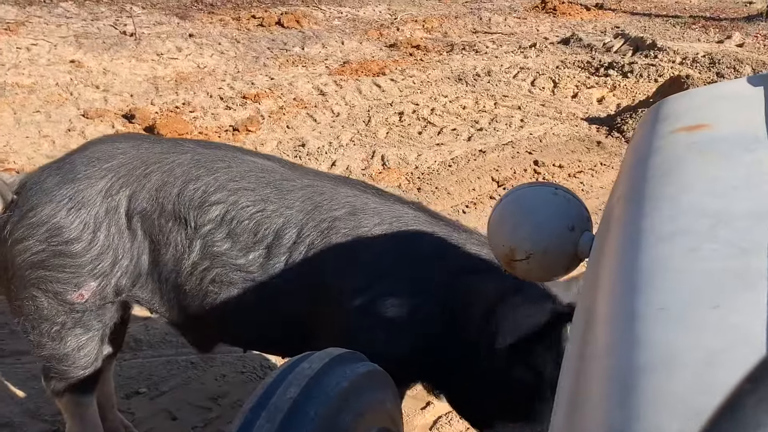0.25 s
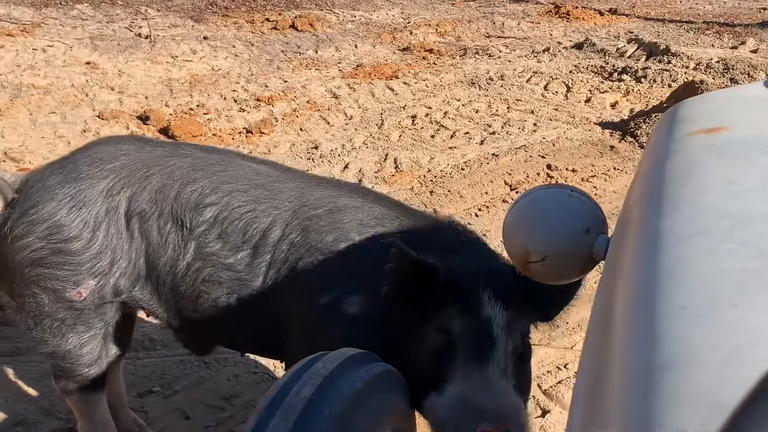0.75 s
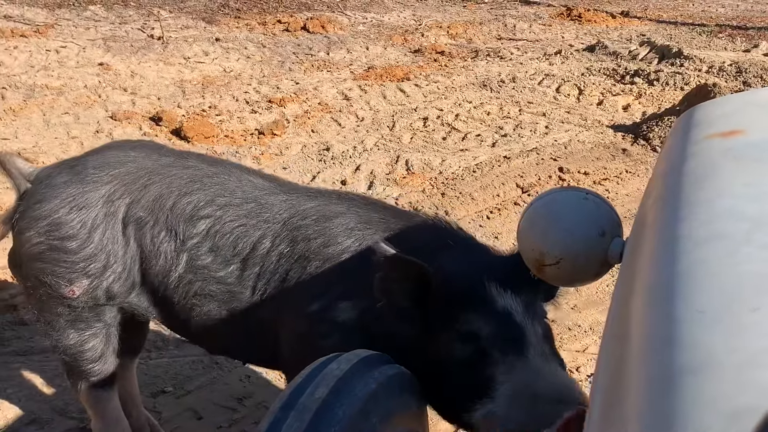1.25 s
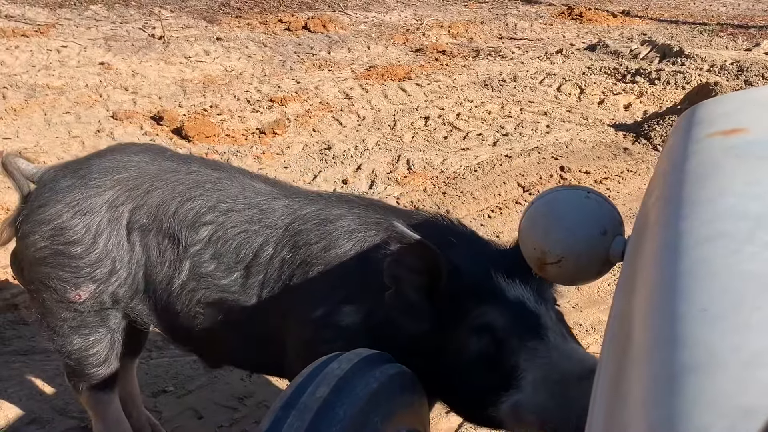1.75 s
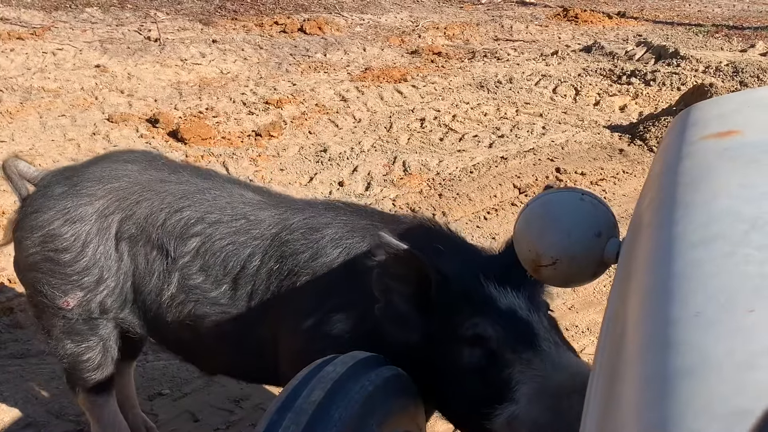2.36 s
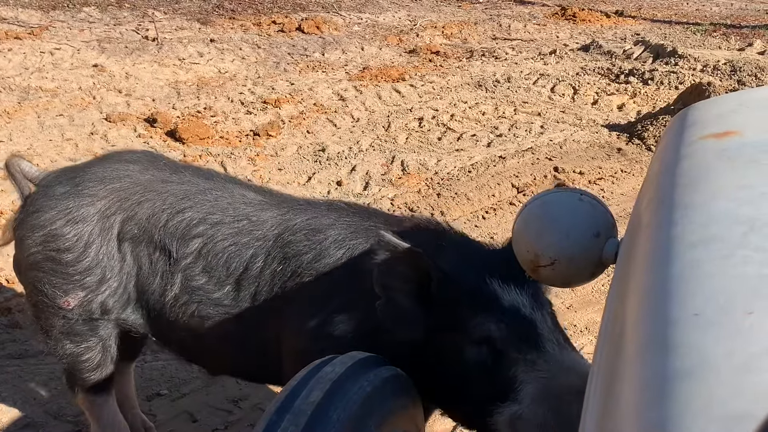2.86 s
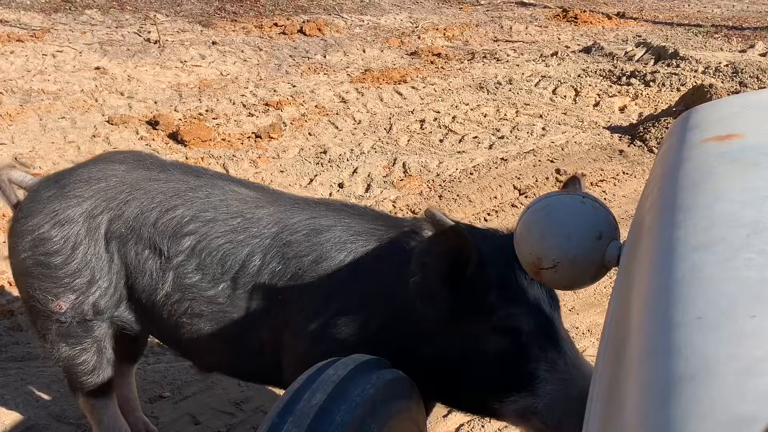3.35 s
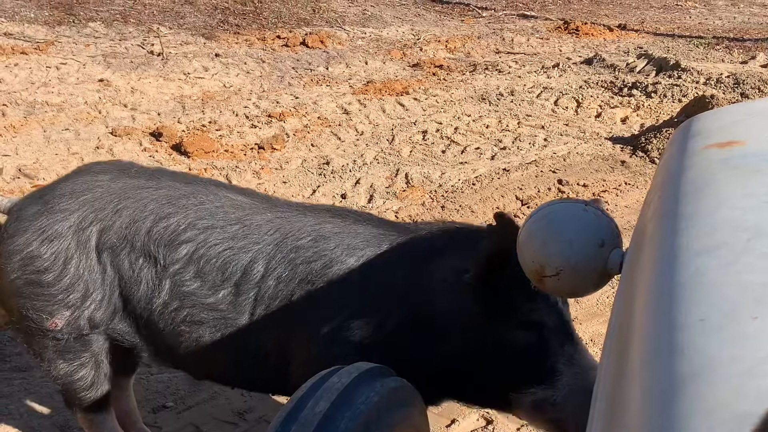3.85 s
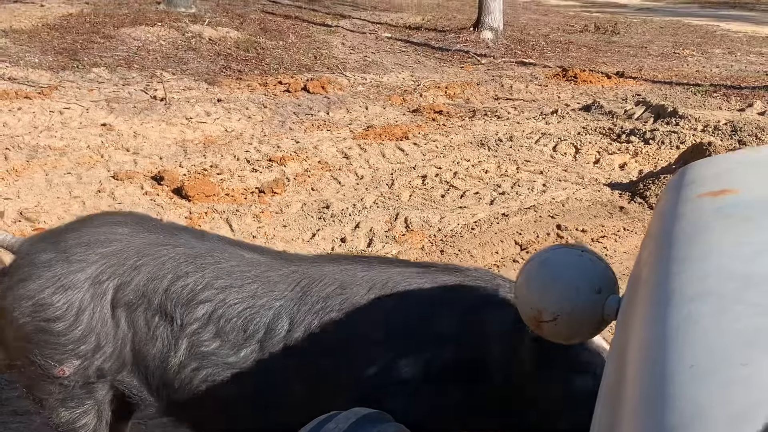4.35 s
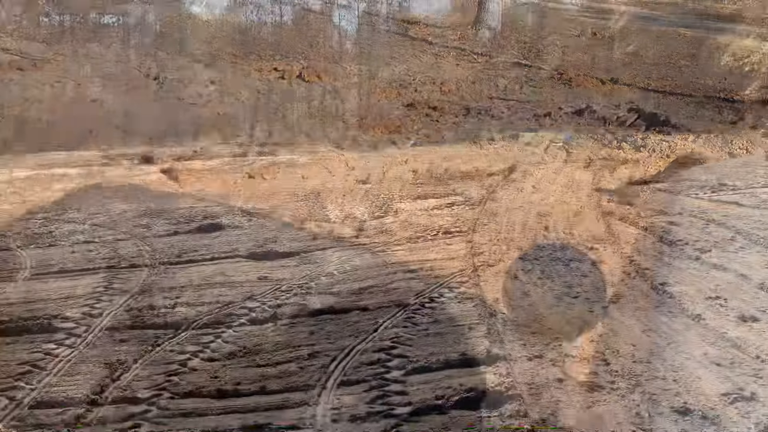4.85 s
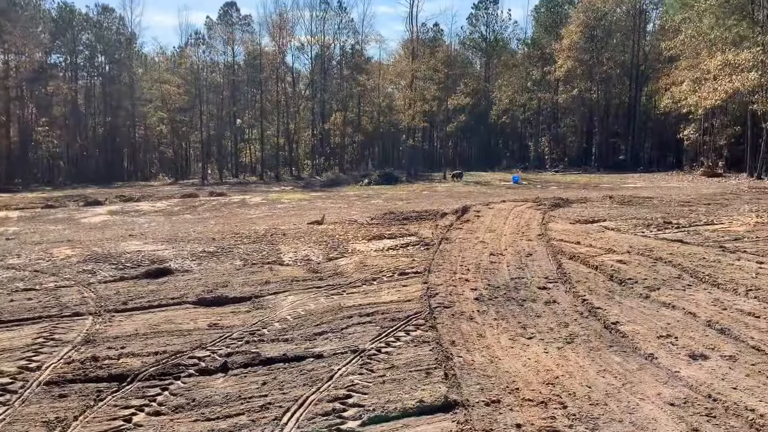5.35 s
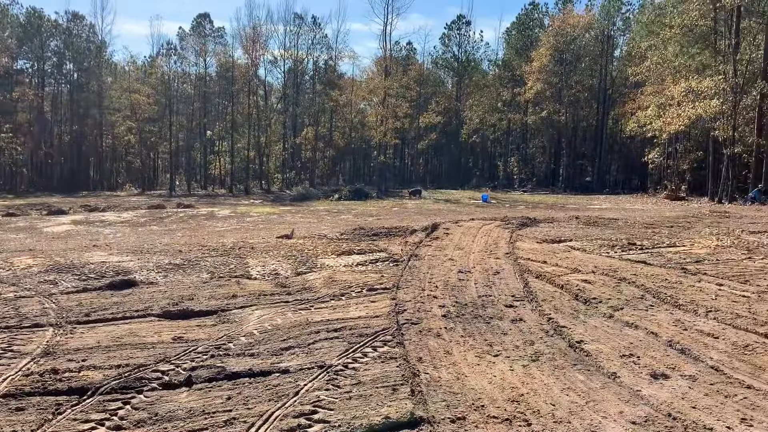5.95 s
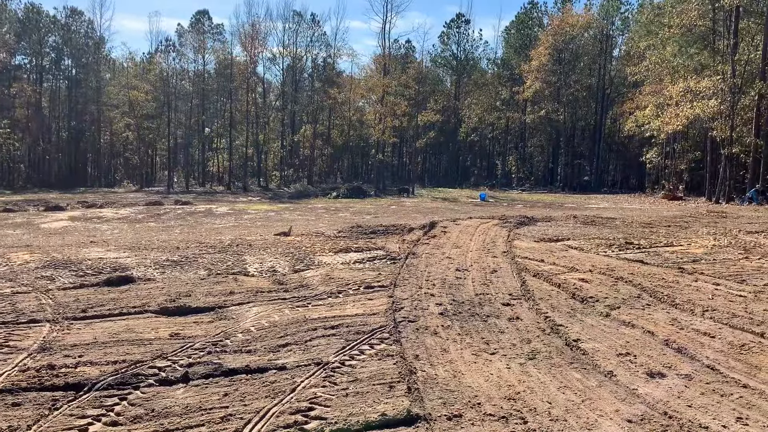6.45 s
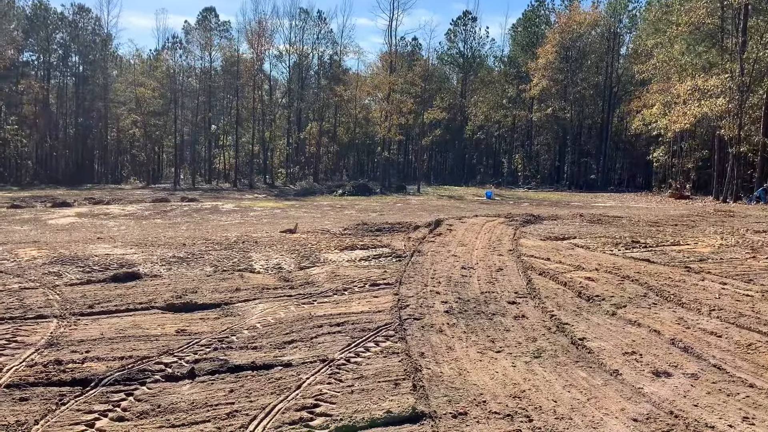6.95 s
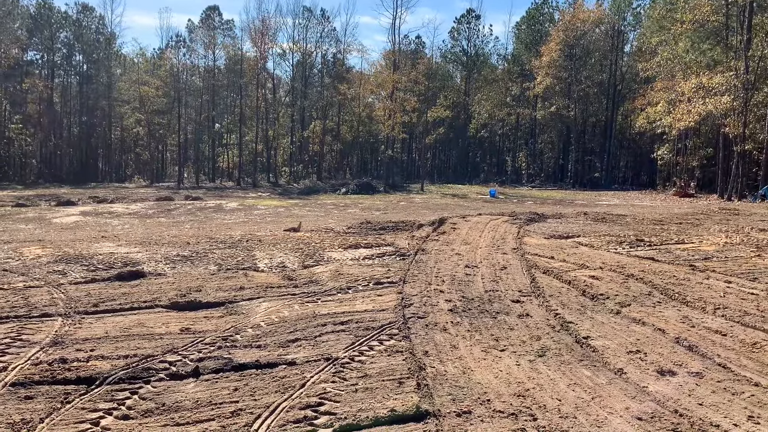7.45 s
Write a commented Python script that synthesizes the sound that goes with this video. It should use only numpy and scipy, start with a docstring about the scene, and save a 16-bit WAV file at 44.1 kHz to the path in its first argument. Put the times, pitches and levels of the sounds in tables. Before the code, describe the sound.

Breathy pig sniffs and a sharp rasping snort outdoors, soft hollow metal knocks, then muffled taps, low engine hum and a faint cricket.

```python
"""In a yard a pig snuffles at a steel tank beside a hand-held camera, then the scene fades over to an open field.
The pig is filtered noise for breathy sniffs and bursts of dying sines for one fluttering snort; struck modes ring
as knocks on the tank. Dull taps (resonant noise) gather around the fade and go on in the field, which adds a far
engine hum (narrow noise) and a cricket (a pulsed sine). Coloured noise makes both backgrounds, a low rumble and a
passing roar; thumps on the microphone are sagging sines, and small bright ticks are resonant snaps of noise.
"""
import sys
import numpy as np
from scipy import signal
from scipy.io import wavfile
from scipy.ndimage import uniform_filter1d

SR = 44100
rng = np.random.default_rng(int(sys.argv[2]) if len(sys.argv) > 2 else 0)


def transcribe(u):
    """Save the signal u as a 16-bit wav file named by the first command-line argument.

    u: samples, shape (n,) or (channels, n), limited to [-1, 1]; the rate is SR.
    q: integer samples, one column per channel.
    """
    v = np.clip(np.atleast_2d(u).T, -1, 1)
    q = np.round(v * 32767).astype(np.int16)
    wavfile.write(sys.argv[1], SR, q)


N = 339119
T = np.arange(N) / SR  # time in seconds

# Low thumps on the microphone. Each row: start in seconds, level in dB, first and last pitch in Hz,
# t60 in seconds, level of the snap in dB, swell of the rumble in dB.
THUMP_HITS = [(1.185, -21.5, 110, 55.9, 0.068, -68, 19), (4.149, -28.5, 194, 51, 0.17, -26.5, 1.5),
              (4.512, -35.5, 73, 50, 0.11, -56, 10)]


def amp(db):
    """Turns decibels into a linear gain."""
    return 10 ** (np.asarray(db) / 20)


def evened(x):
    """Scales a signal to an rms of 1."""
    return x / np.sqrt(np.mean(x ** 2) + 1e-20)


def read(points, hz):
    """Reads a spectral curve at the given frequencies, straight between points on a log scale."""
    f, value = np.transpose(points)
    return np.interp(np.log(hz + 1), np.log(f + 1), value)


def curve(rows, t=T):
    """Reads an automation curve of (seconds, value) rows, straight between points."""
    s, value = np.transpose(rows)
    return np.interp(t, s, value)


def add(mix, s, sound):
    """Lays a sound into the mix at s seconds, cut off at the end of the mix."""
    part = mix[..., round(s * SR):][..., :sound.shape[-1]]
    part += sound[..., :part.shape[-1]]


def resonate(x, hz, width):
    """A resonance of gain 1: shifts hz down to zero, smooths, and shifts back."""
    turn = np.exp(2j * np.pi * hz * np.arange(x.shape[-1]) / SR)
    r = np.exp(-np.pi * width / SR)
    return 2 * (turn * signal.lfilter([1 - r], [1, -r], x / turn)).real


def noise(colour, patchy_db, size, likeness, banded_db=0):
    """Two-channel noise of rms 1 from random short-time spectra, with drifting patches and slow narrow bands."""
    frames, hz = 4 * N // size + 5, np.fft.rfftfreq(size, 1 / SR)
    a, b, c, d, patches, bands = rng.standard_normal((frames, len(hz), 6), dtype=np.float32).T
    # smoothed over frequency first, then over time
    bands = uniform_filter1d(bands, size=2, axis=0)
    bands = evened(uniform_filter1d(bands, size=40, axis=1))
    patches = uniform_filter1d(patches, size=size // 100, axis=0)
    patches = evened(uniform_filter1d(patches, size=8, axis=1))
    same = np.clip(read(likeness, hz), -1, 1)[:, None]
    left = a + 1j * b
    right = same * left + np.sqrt(1 - same ** 2) * (c + 1j * d)
    level_db = read(colour, hz)[:, None] + patchy_db * patches + banded_db * bands
    spectra = np.array([left, right]) * amp(level_db)
    return evened(signal.istft(spectra, nperseg=size, noverlap=3 * size // 4)[1][:, :N])


def ring(modes, factor=1, tilt_db=0, rise=.001, size=SR):
    """Dying sines of random phase, a little apart in the two ears; tilt_db per octave about 300 Hz."""
    t, out = np.arange(size) / SR, 0
    for hz, db, t60 in modes:
        phase = np.cumsum(rng.random(2) * [1, .12])[:, None]  # in cycles
        decay = amp(db + tilt_db * np.log2(hz / 300) - 60 * t / t60)
        out = out + decay * np.sin(2 * np.pi * (hz * factor * t + phase))
    return out * (1 - np.exp(-t / rise)) / abs(out).max()


def air_outdoors():
    """Noise beds: the yard fades into the field with its hum, over rumble that swells at each thump and a roar."""
    # Noise colours. Each row: frequency in Hz, relative level in dB per Hz.
    yard_colour = [(28, -42.5), (45, -11), (70, -8.5), (110, -6.5), (200, -11), (300, -18.5), (500, -23.5),
                   (900, -27), (1400, -39.5), (2500, -44.5), (7000, -50), (14300, -48), (15000, -73.5),
                   (16000, -81.5)]
    field_colour = [(28, -41.5), (45, -29.5), (87, -0.5), (127, -21.5), (240, -17.5), (310, -28),
                    (530, -20.5), (700, -35.5), (950, -24), (1130, -41), (1350, -37), (2200, -51.5),
                    (7000, -53.5), (13700, -56), (14300, -100), (16000, -99)]
    rumble_colour = [(25, -42), (42, 0), (60, 15), (100, 6), (180, 0), (300, -47.5), (1500, -49),
                     (6000, -85.5)]
    roar_colour = [(150, -23.5), (240, -0.5), (700, -6), (1000, -12.0), (1600, -38.5), (16000, -91.5)]
    # Open air in stereo. Each row: frequency in Hz, left-right likeness from 0 to 1.
    diffuse = [(60, .92), (270, .85), (450, .5), (740, .1), (2000, .1), (15000, 0)]
    # Level rides, the roar's for a dull passing sound. Each row: time in seconds, level in dB.
    rumble_ride = [(0, -56), (2., -56.5), (4., -53), (4.7, -59.5), (5.3, -56), (7.69, -57.5)]
    roar_ride = [(4.9, -76.5), (5.4, -71.5), (5.8, -64.5), (6.3, -74), (7.69, -84)]
    # Partials of the far engine. Each row: frequency in Hz, width in Hz, level at first in dB, at the end in dB.
    hum_partials = [(86.18, 0.89, -57.5, -54.5), (169, 1.3, -64, -76.5)]
    yard_db, field_db, fade_s = -61, -58.5, (4.49, 5.09)
    swell_rise_s, swell_fall_s = 0.068, 0.16

    fade = np.interp(T, fade_s, (0, 1))
    hum = np.zeros(N)
    for hz, width, *ends_db in hum_partials:
        partial = evened(resonate(rng.standard_normal(N), hz, width))
        hum += amp(np.interp(T, (6.2, T[-1]), ends_db)) * partial
    yard = amp(yard_db) * noise(yard_colour, patchy_db=-1.5, size=2048, likeness=diffuse)
    field = amp(field_db) * noise(field_colour, patchy_db=2.0, size=2048, likeness=diffuse) + hum
    swell_db = np.zeros(N)
    for s, *_, db in THUMP_HITS:
        swell_db += np.interp(T - s, (-swell_rise_s, 0, swell_fall_s), (0, db, 0))
    rumble = noise(rumble_colour, patchy_db=1.5, size=2048, likeness=diffuse)
    rumble *= amp(curve(rumble_ride) + swell_db)
    roar = amp(curve(roar_ride)) * noise(roar_colour, patchy_db=0.0, size=2048, likeness=diffuse)
    return (1 - fade) * yard + fade * field + rumble + roar


def cricket():
    """Wing strokes 30 times a second pulse a sine, uneven in strength, a few skipped, off to the left."""
    start_s, end_s, strokes_per_s = 5.238, 6.41, 29.8
    strokes = np.clip(T - start_s, 0, end_s - start_s) * strokes_per_s
    skip, strength = rng.random((N, 2))[strokes.astype(int)].T
    pulses = np.sin(np.pi * strokes) ** 2 * (T < end_s)
    pulses *= (skip > .1) * amp(-5. * strength)  # about one stroke in ten is left out
    left_right = amp([[5.], [-7.]])
    return amp(-87.5) * pulses * np.sin(2 * np.pi * 5012 * T) * left_right


def ticks():
    """Tiny snaps: quickly dying noise through a resonance that is relatively broader the higher it lies."""
    # Each row: start in seconds, peak level in dB, centre in Hz.
    snaps = [(0.774, -59, 2390), (.868, -68, 11000), (.992, -63, 11000), (1.05, -61, 11000),
             (1.065, -63, 7000), (1.083, -67, 7000), (1.671, -61.5, 2200), (1.922, -68, 3920),
             (2.31, -67, 3920), (3.216, -55, 2420), (3.517, -52.5, 10900), (4.146, -60, 2480),
             (4.464, -48, 2340), (4.502, -47.5, 4150), (5.186, -62, 8300), (5.671, -62, 6230),
             (5.704, -62, 2400), (5.738, -68, 2380), (6.179, -52, 5400), (6.42, -70.5, 5000),
             (6.51, -69, 9000), (6.79, -65, 11000), (7.65, -66.5, 4100)]
    out, t = np.zeros((2, N)), np.arange(SR // 40) / SR
    for s, db, hz in snaps:
        burst = rng.standard_normal((2, len(t))) * amp(-60 * t / 0.028) * (1 - np.exp(-t / 0.00021))
        width = 0.17 * hz * np.sqrt(hz / 1000)
        snap = resonate(resonate(burst, hz, width), hz, width)
        add(out, s, amp(db) * snap / abs(snap).max())
    return out


def thumps():
    """A blast of air or a jolt on the microphone: a short snap, then one sine that sags in pitch."""
    out, t = np.zeros(N), np.arange(SR // 4) / SR
    for s, db, start_hz, end_hz, t60, snap_db, _ in THUMP_HITS:
        hz = end_hz + (start_hz - end_hz) * np.exp(-t / 0.0057)
        add(out, s, amp(db - 60 * t / t60) * np.sin(2 * np.pi * np.cumsum(hz) / SR))
        from_peak = t - .003
        snap = np.exp(-(from_peak / 0.00075) ** 2) * np.cos(2 * np.pi * 850.0 * from_peak)
        add(out, s - .004, amp(snap_db) * snap)
    return np.array([out, np.roll(out, shift=8)])  # the left port hears it first


def taps():
    """Short noisy blows coloured by one broad resonance, with little treble."""
    # Each row: start in seconds, peak level in dB before panning and treble mixing, centre in Hz, t60 in seconds.
    blows = [(0.277, -69, 468, 0.053), (4.154, -43, 570, 0.025), (4.191, -47.5, 960, 0.022),
             (4.505, -60, 482, 0.07), (4.675, -43.5, 850, 0.36), (4.871, -47.5, 558, 0.12),
             (4.949, -53.5, 645, 0.099), (5.098, -39.5, 536, 0.082), (5.122, -49, 930, 0.045),
             (5.201, -52, 680, 0.022), (5.271, -53, 526, 0.046), (5.387, -35, 510, 0.044),
             (5.413, -51.5, 870, 0.033), (5.51, -42.5, 524, 0.03), (5.67, -40.5, 676, 0.061),
             (5.685, -49.5, 557, 0.018), (6.087, -44, 816, 0.031)]
    out, t = np.zeros((2, N)), np.arange(SR // 8) / SR
    dull = signal.butter(4, (330., 1300.), "band", fs=SR, output="sos")
    left_right = amp([[.6], [-.6]])
    for s, db, hz, t60 in blows:
        near, apart = rng.standard_normal((2, len(t)))
        blow = np.array([near, near + 0.94 * apart])  # the right has extra noise of its own
        blow = blow * amp(-60 * t / max(t60, .005)) * (1 - np.exp(-t / 0.00085))
        body = signal.sosfilt(dull, blow + 13.4 * resonate(blow, hz, 230.0)) + amp(-32.0) * blow
        add(out, s, amp(db) * left_right * body / abs(body).max())
    return out


def tank():
    """A hollow steel shell knocked by the snout: its modes come in close pairs, so they beat as they die."""
    # Each row: start in seconds, level in dB, brightness in dB per octave, factor on the mode frequencies.
    knocks = [(2.344, -34.5, 4.5, 1.16), (2.387, -34.5, 2, .99), (3.01, -37, -18, .95)]
    # Modes of the shell. Each row: frequency in Hz, level in dB, t60 in seconds.
    shell = [(184, -4, 0.86), (237, 3, 0.3), (242.5, 0, 2), (292.4, 10.5, 0.31), (365, -6.5, 2.03),
             (397, -9.5, 0.8), (483, -5, 0.61), (640, -16.5, 0.45), (800, -25, 0.91), (1103, -17, 0.13)]
    out = np.zeros((2, N))
    for s, db, tilt_db, factor in knocks:
        pair = [ring(shell, factor * (1 + split), tilt_db, rise=0.00073) for split in (-.012, .012)]
        add(out, s, amp(db) * sum(pair) / 2)
    return out


def snort():
    """Each flap of the nostril slaps, rings the snout until it shuts again, and puffs low at the microphone."""
    # Each row: start in seconds, level of the ring in dB, brightness in dB per octave, time open in seconds.
    flaps = [(1.101, -46, 1.5, .01), (1.121, -39.5, -12.5, 0.0038), (1.127, -47.5, -2.5, 0.016),
             (1.141, -32, -12.5, 0.0019), (1.146, -32, 2, 0.026), (1.164, -23, -7.5, 0.0038),
             (1.169, -19, 3.5, 0.014), (1.19, -24, 1, 0.0088)]
    # Resonances of the snout, then of the blast on the microphone.
    # Each row: frequency in Hz, level in dB, t60 in seconds.
    snout = [(491, -9.5, 0.071), (1050, -11.5, .1), (1388, -3.5, 0.031), (1763, -3, .1),
             (2810, -12.5, 0.027), (3450, -20, .07), (3390, -24, 0.023), (4250, -36.5, 0.074)]
    blast = [(72, 1.5, .15), (91, 1, 0.11), (217, -0.5, 0.15)]
    out, t = np.zeros((2, N)), np.arange(SR // 4) / SR
    for s, ring_db, tilt_db, open_s in flaps:
        factor = 1 + .16 * np.exp(-(s - flaps[0][0]) / .008)  # the snout starts pinched, its pitch a little high
        shut = np.exp(-np.maximum(t - open_s, 0) / 0.0015)
        rasp = 1 + 0.12 * evened(uniform_filter1d(rng.standard_normal(len(t)), size=30))
        accent = 1 + 0.58 * np.exp(-t / 0.0026)
        tone = ring(snout, factor, tilt_db, rise=0.000411, size=len(t))
        add(out, s, amp(ring_db) * tone * shut * rasp * accent)
        slap = resonate(rng.standard_normal((2, len(t))), 3200., 2500.) * amp(-60 * t / .02)
        add(out, s, amp(ring_db + tilt_db - 18.0) * slap)
        puff_db = ring_db - 10.5 - 0.8 * tilt_db  # dull flaps puff harder
        add(out, s - .003, amp(puff_db) * ring(blast, rise=0.0015, size=len(t)).mean(0))
    return out


def sniffs():
    """Turbulent air through the nostrils: chest, flow, a resonance placed per breath, and rim hiss on one arch."""
    # Breaths and soft rustles. Each row: start in seconds, length in seconds, share of it spent rising
    # (held within .05 to .95), airflow in dB, chestiness under 1.3 kHz in dB, nostril resonance in Hz,
    # its level in dB, rim hiss in dB.
    breaths = [(-.06, 0.14, 0.29, -66, 6, 1250, -10, -73), (.19, .06, .4, -88, 2, 3000, -4, -70),
               (0.248, 0.17, 0.54, -65, 9.5, 451, 1, -74), (0.805, 0.38, 0.96, -85, -7.5, 3900, -20, -73.5),
               (1.071, 0.2, 0.4, -59, 12, 4100, -6, -92), (1.149, 0.21, .4, -51, 5.5, 3770, -7.5, -47),
               (1.68, 0.31, 0.44, -83, 4, 3850, -21.5, -75),
               (1.948, 0.22, 0.54, -55, 3, 3400, -10.5, -52.5),
               (2.286, 0.23, 0.76, -72, 6.5, 4200, -21, -78.5), (2.771, 0.26, 0.17, -72, 1, 1907, -7, -71),
               (2.967, 0.27, .35, -63.5, -2.5, 1136, -4.5, -59),
               (3.156, 0.055, 0.4, -72, 10, 1147, -4, -55.5),
               (3.185, 0.24, 0.49, -55, 5.5, 1096, -1.5, -54), (3.506, 0.23, 0.24, -71.5, 5, 3030, -6, -69),
               (3.624, 0.16, 0.52, -79, 13, 3140, -25, -69), (3.72, 0.36, 0.25, -65.5, 9, 4100, -15, -75),
               (4.125, 0.21, 0.33, -74, 8.5, 990, 5, -77.5), (4.272, 0.2, 0.35, -69.5, 3, 1020, 2, -74),
               (4.414, 0.21, 0.32, -64.5, 10, 4500, -18, -70.5),
               (4.539, 0.21, 0.47, -62.5, 9, 4480, -20, -69), (4.683, 0.16, 0.27, -71, 7, 4440, -24, -78),
               (4.782, 0.13, 0.75, -74.5, 20.5, 890, 11, -93),
               (6.147, 0.27, 0.084, -80.5, -16, 4860, -6, -82)]
    # Colour of the air. Each row: frequency in Hz, relative level in dB per Hz.
    air_colour = [(120, 13), (300, 6), (600, 7), (1300, -2), (2500, -4.5), (4000, -4), (5200, -13.5),
                  (7700, -20)]
    # Stereo of the air. Each row: frequency in Hz, left-right likeness from 0 to 1.
    air_likeness = [(60, .93), (300, .85), (800, .6), (3000, .4), (7000, 0), (15000, 0)]
    attack_s, release_s = 0.039, 0.035
    flow_dome_db, hiss_dome_db = -18.5, -27.5  # how far the ends of a breath lie under its top

    # the air's colour drifts slowly in narrow random bands
    air = noise(air_colour, patchy_db=2.5, size=512, likeness=air_likeness, banded_db=2.5)
    low = evened(signal.sosfilt(signal.butter(3, 1300, fs=SR, output="sos"), air))
    high = evened(signal.sosfilt(signal.butter(4, 7700, "high", fs=SR, output="sos"), air))
    middle = evened(signal.sosfilt(signal.butter(3, (1300, 7700), "band", fs=SR, output="sos"), air))
    out = np.zeros((2, N))
    for start, length, rising, flow_db, chest_db, hz, nostril_db, hiss_db in breaths:
        now = slice(round(max(start, 0) * SR), round((start + length) * SR))
        since = T[now] - start
        top_s = np.clip(rising, .05, .95) * length
        arch = abs(np.sin(np.pi * np.interp(since, (0, top_s, length), (0, .5, 1))))
        width = 60 + (hz / 150) ** 2  # higher resonances are broader
        nostril = evened(resonate(resonate(air[:, now], hz, width), hz, width))
        breath = amp(chest_db) * low[:, now] + middle[:, now] + amp(nostril_db) * nostril
        edges = np.minimum(since / attack_s, (start + length - T[now]) / release_s)
        edges = np.clip(edges, 0, 1) ** 2
        flow = amp(flow_db + flow_dome_db * (1 - arch))
        hiss = amp(hiss_db + hiss_dome_db * (1 - arch))
        add(out, max(start, 0), edges * (flow * breath + hiss * high[:, now]))
    wet_db = evened(uniform_filter1d(rng.standard_normal(N), size=200))  # wet, uneven flow, 1 dB rms
    return out * amp(wet_db)


def scene():
    """Sums the pig, the tank, the small sounds and the open air."""
    return sniffs() + snort() + tank() + taps() + thumps() + ticks() + air_outdoors() + cricket()


def record(dry):
    """Two ports: shared treble a little early on the right, mono bass below a moving edge, then a band limit."""
    # Each row: frequency in Hz, share of the treble common to both ports.
    paired = [(5500, 0), (6300, .8), (7800, .97), (16000, .97)]
    # Edge of the mono bass. Each row: time in seconds, frequency in Hz.
    mono_below = [(4.45, 13), (4.7, 940), (6, 710), (7.69, 67)]
    in_step_hz, port_lead_s, edge_hz = 6100, 2.04e-4, 15900
    hz, t, (left, right) = signal.stft(dry, SR, nperseg=1024)
    hz = hz[:, None]
    common = read(paired, hz)
    early_left = left * np.exp(2j * np.pi * (hz - in_step_hz) * port_lead_s)
    right = np.sqrt(1 - common ** 2) * right + common * early_left
    mid = (left + right) / 2
    side = (left - right) / 2 * (hz > curve(mono_below, t))
    ports = signal.istft(np.array([mid + side, mid - side]), SR, nperseg=1024)[1][:, :N]
    band_limit = signal.firwin(511, edge_hz, window=("kaiser", 9), fs=SR)
    return signal.oaconvolve(ports, band_limit[None], "same")


dry = scene()
out = record(dry)
transcribe(out)
```